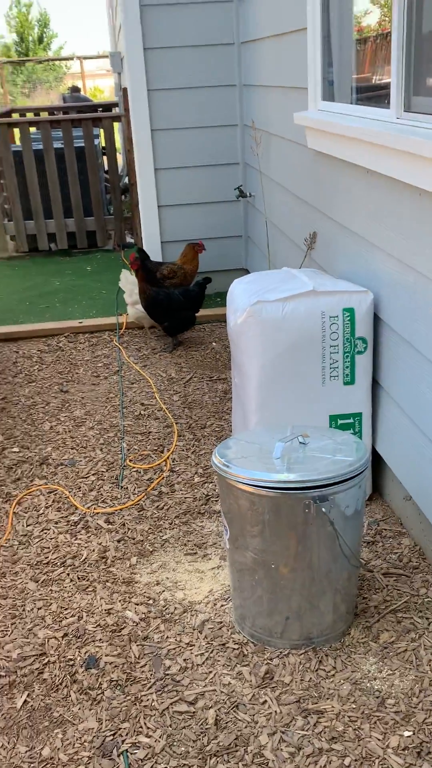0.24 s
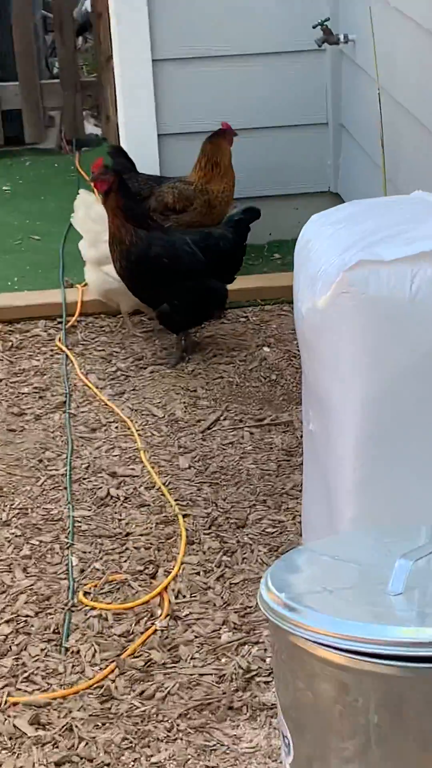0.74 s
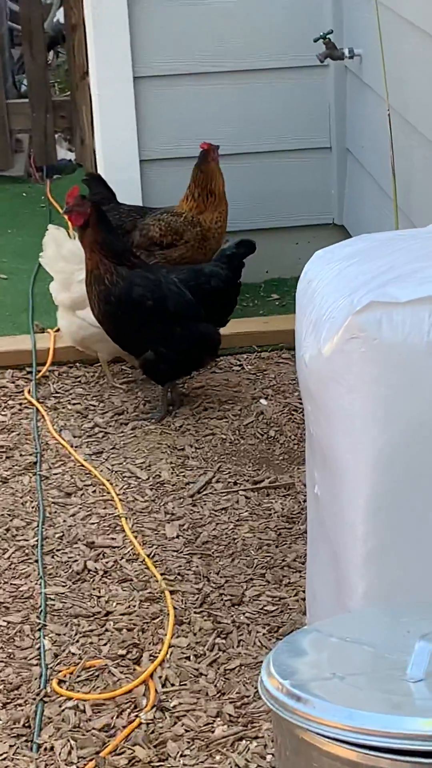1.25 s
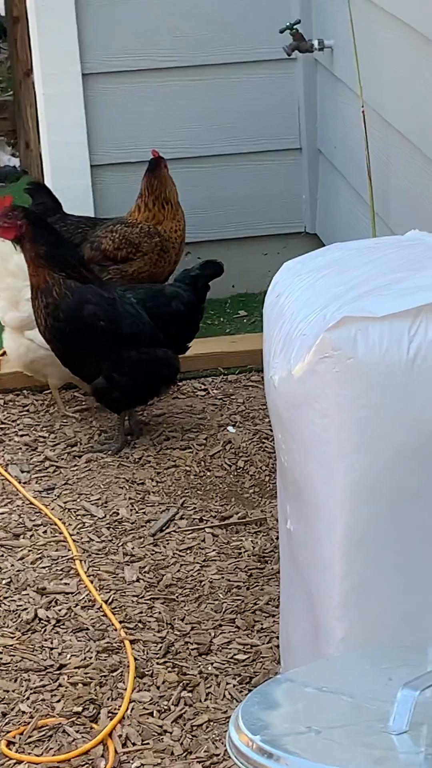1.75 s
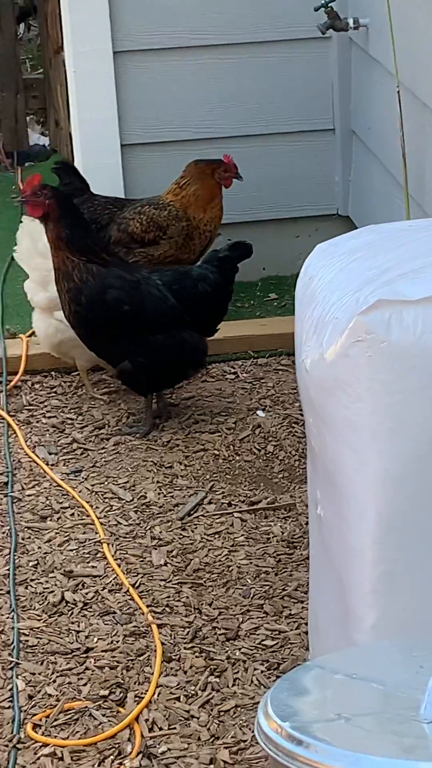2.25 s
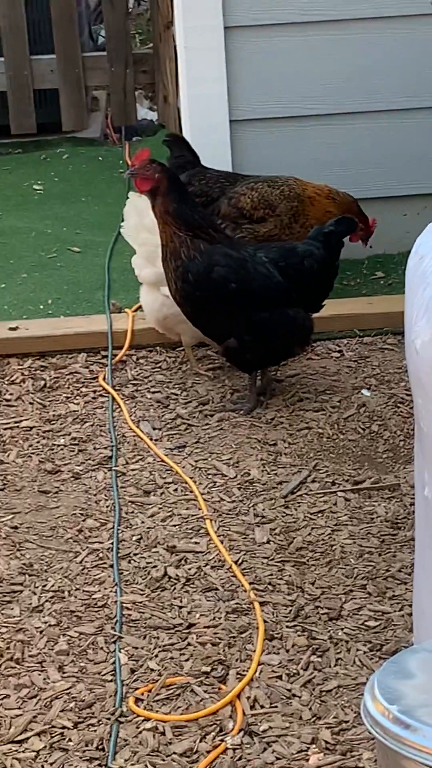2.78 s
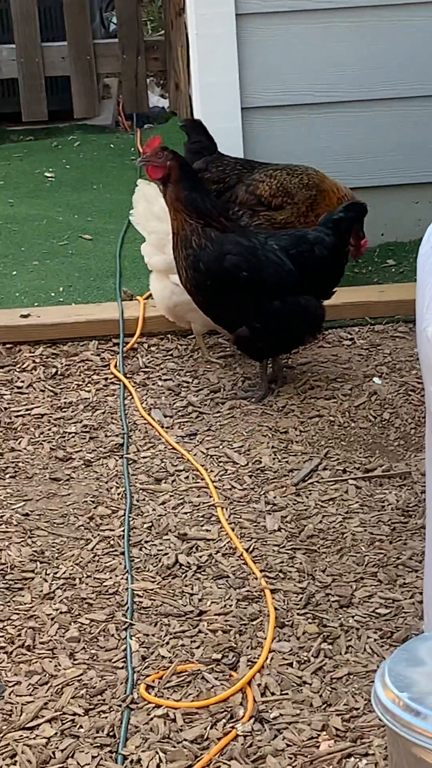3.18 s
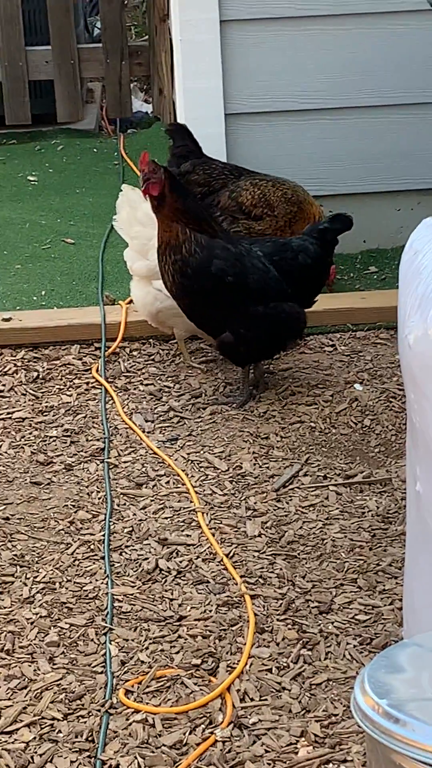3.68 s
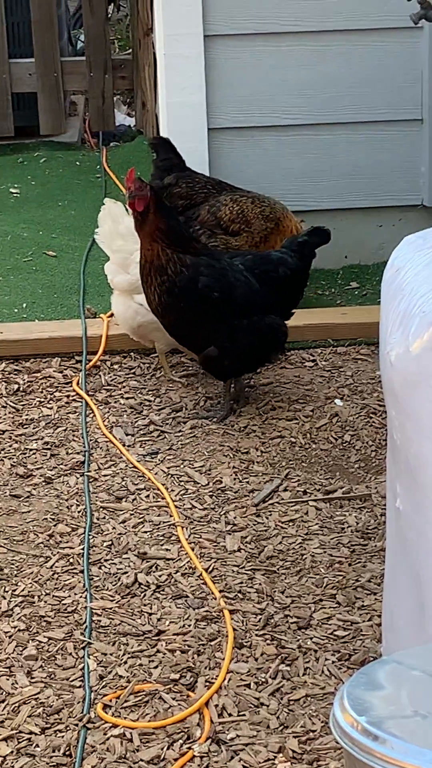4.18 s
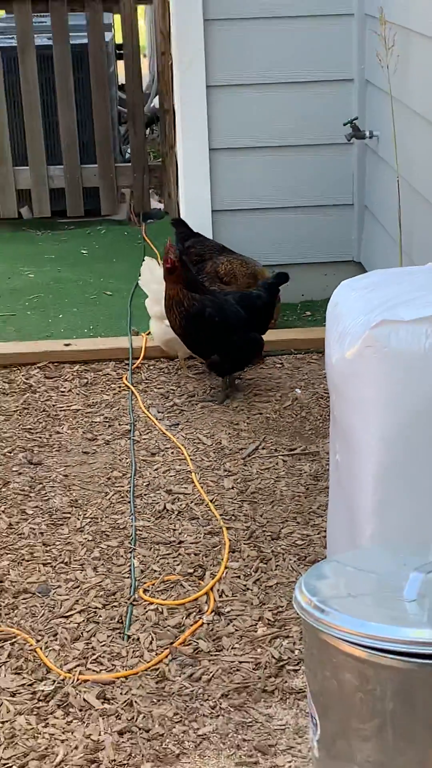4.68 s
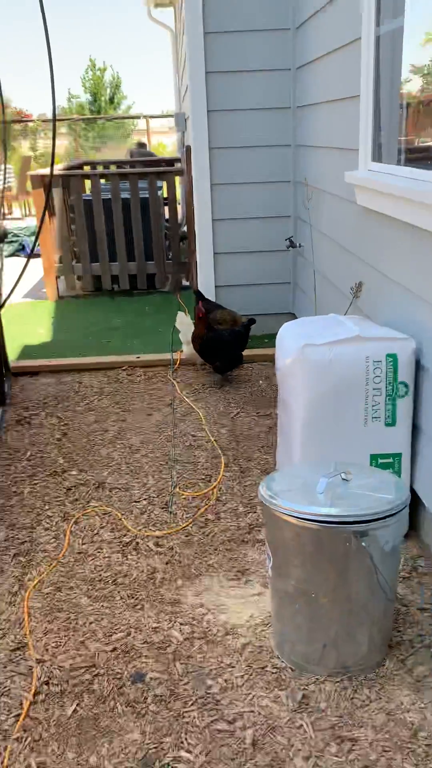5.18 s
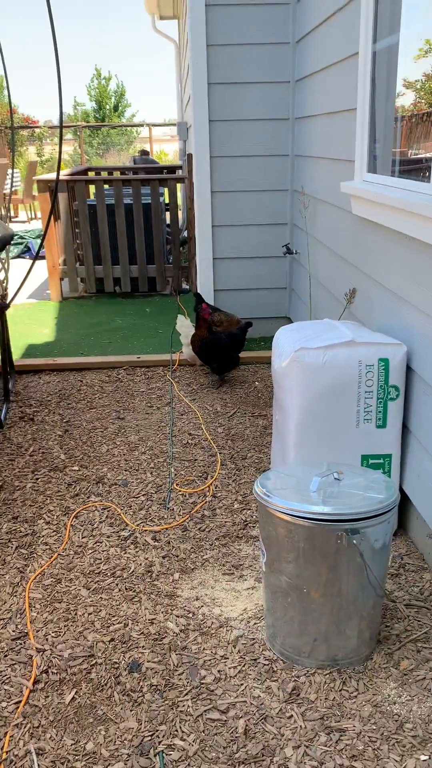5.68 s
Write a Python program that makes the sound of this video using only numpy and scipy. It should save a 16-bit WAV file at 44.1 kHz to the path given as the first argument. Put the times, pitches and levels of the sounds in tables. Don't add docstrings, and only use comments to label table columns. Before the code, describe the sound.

A hen gives low, throaty clucks in a walled yard and twice breaks into a sharp rising squawk, with a late wind thump.

```python
import sys
import numpy as np
from scipy import signal
from scipy.fft import rfft, irfft, next_fast_len
from scipy.io import wavfile
from scipy.ndimage import uniform_filter1d, map_coordinates

SR = 44100
rng = np.random.default_rng(int(sys.argv[2]) if len(sys.argv) > 2 else 0)


def decibels_to_gain(level_db):
    exponent = np.asarray(level_db, float) / 20
    return 10 ** exponent


def generate_wav(sig):
    pcm = np.round(np.clip(np.atleast_2d(sig).T, -1, 1) * 32767).astype(np.int16)
    wavfile.write(sys.argv[1], SR, pcm)


N = 261513

# start in seconds, length in seconds, level in dB, held pitch in Hz,
# head turned to the phone from 0 to 1.
CLUCKS = [(-.035, 0.073, -38.5, 300, 0.6), (0.281, 0.059, -32.5, 257.4, 0.4),
          (1.266, 0.07, -28, 270.4, 0.53), (2.102, 0.068, -27, 295.5, 0.2),
          (2.397, 0.065, -31.5, 256.3, 0.2), (3.235, 0.068, -29.5, 268.5, 0.39),
          (4.645, 0.058, -27, 262.3, .55), (4.945, 0.055, -31.5, 264.8, 0.9), (5.243, .066, -32, 262, 0.87),
          (5.527, .068, -32.5, 241.6, 0.87), (5.827, 0.074, -31.5, 262.7, 0.91)]
# share of its length from 0 to 1, level in dB.
CLUCK_SHAPE = [(0, -6), (.25, -2.5), (.72, -0.5), (.86, -4), (1, -12)]
# time in seconds, pitch in Hz, level in dB,
# beak resonance in dB.
SQUAWKS = [
    [(1.635, 442, -24, -13), (1.68, 450, -19.5, -11.5), (1.737, 458.7, -21.5, -12),
     (1.762, 465.7, -14, -33), (1.802, 480, -18, -36.5), (1.822, 501.6, -14, -24.5),
     (1.838, 540.7, -12, -24), (1.863, 521, -14.5, -21.5), (1.893, 442.3, -30, -18)],
    [(3.637, 431.3, -24.5, -14), (3.657, 446.9, -19.5, -22.5), (3.725, 450, -20, -7),
     (3.76, 464, -14, -20.5), (3.802, 483.4, -21.5, -18.5), (3.822, 496.5, -14.5, -27),
     (3.838, 540.4, -10, -15.5), (3.862, 516, -16.5, -22.5), (3.897, 448, -27.5, -14.5)],
]
# time from the opening
# in seconds, pitch in Hz, level against the open squawk in dB.
SQUAWK_START = [(-.121, 212, -16.5), (-.107, 230.3, -8.5), (-.052, 345, -6), (-.03, 349.8, -7)]
# second resonance in dB, third in Hz, third in dB, treble in dB.
SQUAWK_START_VOICE = (-23.5, 2848, -20, -40.5)
# time from the opening in seconds, roughness, strong-weak alternation
HOARSENESS = [(-.12, .25, .2, 0), (-.075, .4, .2, 0), (-.025, .7, .5, .1), (0, .12, 0, 1),
              (.025, .03, 0, 1), (.19, .04, 0, 1), (.21, .22, .03, 1), (.265, .5, .1, 1)]
# frequency in Hz, left against right in dB.
HEN_SIDE = [(300, .5), (500, 0), (750, -11), (1050, -9), (1500, -3), (2300, -2), (3000, 1), (4000, 0)]
# frequency in Hz, time to fall 60 dB in seconds.
YARD_DECAY = [(250, 0.56), (1000, 0.24), (2100, .26), (3000, 0.25), (3600, 0.23), (10000, 0.075)]
# delay in seconds, level in dB.
WALL_ECHOES = [(.006, -22.5), (0.013, -13), (.019, -15.5), (.031, -15.5)]
# time in seconds, level in dB.
AIR_UNIT_LEVEL = [(0, -58.5), (.43, -52), (.6, -56.5), (1.1, -52.5), (1.45, -52), (1.75, -53), (2.1, -58),
                  (2.5, -57), (3.0, -53), (3.6, -61.5), (4.3, -57), (5.0, -52.5), (5.93, -55)]
# frequency in Hz, density in dB per Hz.
AIR_UNIT_COLOUR = [(12, -53.5), (20, -29.5), (49, -4.5), (70, 1.5), (130, -16), (146, -29.5), (200, -30),
                   (260, -42.5), (440, -120)]
# time in seconds, level in dB.
TOWN_LEVEL = [(0, -71), (.45, -64), (1.0, -71), (1.35, -68.5), (1.95, -70), (2.4, -70.5), (3.0, -71),
              (4.2, -72.5), (4.6, -69.5), (4.9, -63), (5.3, -67), (5.93, -67)]
# frequency in Hz, density in dB per Hz.
TOWN_COLOUR = [(100, -41.5), (160, 9), (300, 4.5), (700, -6), (1300, -7.5), (2200, -25), (4000, -39),
               (8000, -59)]
# frequency in Hz, density in dB per Hz.
HISS_COLOUR = [(1500, -31.5), (3000, 2), (7000, -1.5), (11000, -2), (14000, -3.5), (15700, -14)]
# frequency in Hz, likeness from 0 to 1.
LIKENESS = [(100, 0.99), (200, 0.92), (350, 0.79), (700, .3), (2500, 0.1), (4500, 0.99), (16000, 1)]
# peak time in seconds, peak level in dB, rise in dB per second,
# fall in dB per second.
GUST = [(4.7, -34.5, 291, 70), (4.964, -47, 250, 64), (5.25, -50, 245, 304)]
# peak time in seconds, peak level in dB, rise in dB per second,
# fall in dB per second.
GUST_WASH = [(4.69, -50, 300, 50), (4.86, -50, 90, 48)]
# frequency in Hz, density in dB per Hz.
GUST_COLOUR = [(50, -45), (100, 5.5), (200, 0), (350, -3.5), (600, -20), (1500, -57.5)]
# frequency in Hz, density in dB per Hz.
GUST_WASH_COLOUR = [(200, -18), (400, 1.5), (900, 2), (1500, -1), (3000, -9.5), (4200, -22), (5000, -44),
                    (12000, -46)]
# peak time in seconds, peak level in dB, rise in dB per second,
# fall in dB per second.
RUSTLES = [
    [(0, -58.5, 900, 900), (.056, -56.5, 443, 347), (.244, -63, 65, 150), (.412, -66.5, 40, 2600)],
    [(.746, -76, 900, 320)],
    [(5.422, -64, 870, 95)],
]
# frequency in Hz, density in dB per Hz.
RUSTLE_COLOURS = [
    [(1500, -5.5), (3500, -1), (6500, -3.5), (11000, -15.5), (16000, -25)],
    [(1500, -39), (3500, 2), (6500, 3), (11000, -7), (16000, -21)],
    [(3000, -26), (6000, -4.5), (10500, -3.5), (14000, 5.5), (16000, -9.5)],
]
# peak time in seconds, peak level in dB, rise in dB per second, fall in dB per second.
CREAKS = [(.472, -70.5, 90, 100), (.592, -69.5, 800, 460), (2.69, -83, 300, 30)]
# frequency in Hz, density in dB per Hz.
CREAK_COLOUR = [(1400, -34), (1900, -3.5), (2250, 1.5), (2600, -30)]
# time in seconds, peak in dB, ring in Hz, time to fall 60 dB in seconds.
TICKS = [(0.127, -58, 8100, .002), (.144, -52, 8100, 0.0019), (0.407, -40, 909, 0.0051),
         (0.407, -58, 5000, 0.0024), (.595, -44.5, 1090, 0.0042), (.963, -44.5, 10400, 0.0016),
         (.993, -60, 8700, .01), (2.03, -48.5, 11260, 0.0014), (3.082, -60, 3040, 0.0067),
         (3.116, -44.5, 812, 0.022), (3.118, -52, 4940, 0.014), (4.636, -61.5, 11100, .002),
         (5.46, -64, 2500, 0.0036), (5.482, -66.5, 2480, 0.004)]
# time in seconds, peak in dB, ring in Hz, time to fall 60 dB in seconds.
KNOCK = (.897, -33, 75, .2)
# frequency in Hz, lead in radians.
LEFT_LEAD = [(0, 0), (1300, .1), (2700, 1.3), (4800, 3.14), (15300, 18.85), (17400, 22)]


def unit(x):
    return x / np.sqrt(np.mean(x ** 2) + 1e-20)


def along(points, hz):
    f, value = np.transpose(points)
    return np.interp(np.log(hz + 1), np.log(f + 1), value)


def curves(rows, s):
    at, *columns = np.transpose(rows)
    return [np.interp(s, at, column) for column in columns]


def wobble(rate, size=N):
    knots = rng.standard_normal(int(size * rate / SR) + 4)
    return map_coordinates(knots, [np.arange(size) * rate / SR])


def filtered(x, response):
    m = next_fast_len(x.shape[-1] + 8192)
    spectrum = rfft(x, m) * response(np.fft.rfftfreq(m, 1 / SR))
    return irfft(spectrum, m)[..., :x.shape[-1]]


def add(out, start, x):
    first = round(start * SR)
    part = out[..., max(first, 0):first + len(x)]
    part += x[max(-first, 0):][:part.shape[-1]]


def swells(rows):
    s = np.arange(N) / SR
    levels = [db - np.maximum(rise * (peak - s), fall * (s - peak)) for peak, db, rise, fall in rows]
    return decibels_to_gain(np.max(levels, axis=0))


def rush(colour, patchy_db):
    z = signal.stft(rng.standard_normal((2, N)), nperseg=512)[2]
    patches = uniform_filter1d(rng.standard_normal(z.shape[1:]), size=6, axis=0)
    patches = unit(uniform_filter1d(patches, size=10, axis=1))
    pair = signal.istft(z * decibels_to_gain(patchy_db * patches), nperseg=512)[1][:, :N]

    def mid_and_side(hz):
        turn = np.arccos(np.clip(along(LIKENESS, hz), -1, 1)) / 2
        return decibels_to_gain(along(colour, hz)) * [np.cos(turn), np.sin(turn)]

    mid, side = filtered(pair, mid_and_side)
    return unit(np.array([mid + side, mid - side]))


def closed(second_db, third_hz, third_db, treble_db):
    return [(270, 200, -14), (870, 230, -1), (1100, 260, 0), (1950, 450, second_db),
            (third_hz, 450, third_db), (3820, 330, -24 - (third_hz - 2800) / 80),
            (4600, 500, -36), (5500, 600, treble_db - 3.0), (6900, 500, treble_db),
            (8600, 800, treble_db), (9800, 500, treble_db - 11), (13800, 1800, treble_db - 10.5)]


def wide_open(cheek_db, beak_db):
    return [(450, 54, -19.5), (910, 170, -1.5), (1084, 140, 3.5), (1240, 190, cheek_db),
            (1940, 350, -15.0), (2236, 220, beak_db), (3340, 470, -27.5), (4170, 500, -28.0),
            (6005, 350, -29.5), (7460, 570, -38), (8600, 330, -31.5), (9940, 430, -39.5),
            (11300, 1600, -45.5), (14000, 1500, -54.0)]


def pipe(modes, hz):
    total = 0
    for k, (center, width, db) in enumerate(modes):
        resonance = 1j * hz * width / (center * center - hz * hz + 1j * hz * width)
        total = total + (-1) ** k * decibels_to_gain(db) * resonance ** 2
    return total


def call(pitch, db, hoarse, shut, beak_db):
    sway_db, jitter, shimmer_db, breath = 5.5, .1, 3, 1.2
    edge_s, wake_s = .002, .018
    n = len(pitch)
    on = np.clip(np.minimum(np.arange(n), n - np.arange(n)) / (edge_s * SR), 0, 1)
    rough, alternate, gape = hoarse

    def shake(rate):
        return wobble(rate, size=n)

    def every_sample(g):
        return uniform_filter1d(np.repeat(g, 16, axis=-1), size=16, axis=-1)[..., :n]

    shaken_pitch = pitch * (1 + jitter * rough * (shake(130) + .7 * shake(40)))
    turns = np.cumsum(shaken_pitch + 0.54 * shake(300)) / SR
    k = np.arange(1, 61)[:, None]
    hz = k * pitch[::16]

    moving = pipe(wide_open(-20.5, beak_db[::16]), hz)
    heard = ((1 - gape[::16]) * pipe(shut, hz) + gape[::16] * moving) * (hz > 600)
    size = on * decibels_to_gain(db) / every_sample(np.sqrt(np.sum(np.abs(heard) ** 2, axis=0) / 2))
    size *= (1 + alternate * np.cos(np.pi * turns)) * decibels_to_gain(shimmer_db * rough * shake(110))

    knots = rng.standard_normal((len(k), hz.shape[1] // 150 + 4))
    sway = map_coordinates(knots, np.broadcast_arrays(k - 1, np.arange(hz.shape[1])[None] / 150))
    puffs = rng.standard_normal((2, len(k), hz.shape[1] + 8))
    puffs = 3 * uniform_filter1d(puffs[0] + 1j * puffs[1], size=9, axis=1)[:, 4:-4]
    source = decibels_to_gain((sway_db * sway - 1.0) * (hz > 2500)) * (hz < 15500)
    source = source * (1 + breath * rough[::16] * np.minimum(k / 8, 1.5) * puffs)
    source *= 1 - 0.95 * (hz > 1500) * np.exp(-np.arange(n)[::16] / (wake_s * SR))

    stack = every_sample(source) * np.exp(2j * np.pi * k * turns)
    ring_out = (0, SR // 20)
    pulses = np.pad((1 - gape) * size * stack.real.sum(axis=0), ring_out)
    sung = np.pad(gape * size * np.real(every_sample(moving) * stack).sum(axis=0), ring_out)

    def cavity(f):
        return (1 - 0.76 * np.exp(-((f - 2700) / 230) ** 2)) / (1 + (330 / (f + 1)) ** 6)

    return filtered(pulses, lambda f: pipe(shut, f)) + filtered(sung, cavity)


def cluck(length, db, held_hz, facing):
    first_pitch, rise_s = .8, .016
    rough, alternate = .3, .22
    s = np.arange(round(length * SR)) / SR
    pitch = held_hz * (1 - (1 - first_pitch) * np.exp(-s / rise_s))
    second_db = -25.5 + 0.25 * (held_hz - 260)
    third_hz = 2600 + facing * (3076 - 2600)
    third_db = -31.5 + facing * (-11.5 + 31.5)
    treble_db = -43 + facing * (-41.5 + 43)
    shut = closed(second_db, third_hz, third_db, treble_db)
    hoarse = np.outer([rough, alternate, 0], s ** 0)
    return call(pitch, db + curves(CLUCK_SHAPE, s / length)[0], hoarse, shut, 0 * s)


def squawk(body):
    opening, _, body_db, beak_db = body[0]
    rows = [(opening + s, hz, body_db + db, beak_db) for s, hz, db in SQUAWK_START] + list(body)
    s = np.arange(rows[0][0], rows[-1][0], 1 / SR)
    pitch, db, beak_db = curves(rows, s)
    hoarse = curves(HOARSENESS, s - opening)
    return s[0], call(pitch, db, hoarse, closed(*SQUAWK_START_VOICE), beak_db)


def hen():
    out = np.zeros(N)
    for start, *voice in CLUCKS:
        add(out, start, cluck(*voice))
    for body in SQUAWKS:
        add(out, *squawk(body))
    return out


def yard(x):
    hz, t, z = signal.stft(rng.standard_normal((2, SR // 2)), SR, nperseg=256)
    tail = signal.istft(z * decibels_to_gain(-60 * t / along(YARD_DECAY, hz)[:, None]), SR, nperseg=256)[1]
    tail[1] = 0.37 * tail[0] + .5 * tail[1]
    tail /= np.linalg.norm(tail, axis=1, keepdims=True)
    answer = decibels_to_gain(-12) * np.pad(tail, ((0, 0), (300, 0)))
    answer[:, 0] = 1
    for late, db in WALL_ECHOES:
        answer[:, round(late * SR)] += decibels_to_gain(db)
    return signal.fftconvolve(x[None], answer, axes=1)[:, :N]


def background():
    s = np.arange(N) / SR
    throb_db = curves(AIR_UNIT_LEVEL, s)[0] + 3 + 0.79 * wobble(9) + 1.2 * wobble(2.3)
    throb = decibels_to_gain(throb_db) * rush(AIR_UNIT_COLOUR, patchy_db=2)
    town_db = curves(TOWN_LEVEL, s)[0] + 6.5 + 0.27 * wobble(7.1)
    town = decibels_to_gain(town_db) * rush(TOWN_COLOUR, patchy_db=0.0)
    hiss = decibels_to_gain(-83) * rush(HISS_COLOUR, patchy_db=0.5)
    return throb + town + hiss


def rustles_and_creaks():
    out = np.zeros((2, N))
    for rows, colour in zip(RUSTLES + [CREAKS], RUSTLE_COLOURS + [CREAK_COLOUR]):
        out += swells(rows) * decibels_to_gain(3 + 1.5 * wobble(60)) * rush(colour, patchy_db=2)
    return out


def ticks_and_knock():
    out = np.zeros((2, N))
    t = np.arange(SR // 4) / SR
    for s, db, hz, t60 in TICKS + [KNOCK]:
        add(out, s, decibels_to_gain(db - 60 * t / t60) * np.sin(-2 * np.pi * hz * t))
    return out


def wind_puff():
    low = swells(GUST) * decibels_to_gain(2.8 * wobble(45)) * rush(GUST_COLOUR, patchy_db=2.0)
    bright = swells(GUST_WASH) * decibels_to_gain(0.63 * wobble(36)) * rush(GUST_WASH_COLOUR, patchy_db=3.5)
    return low + bright


def scene():
    def shade(hz):
        return decibels_to_gain(along(HEN_SIDE, hz) * [[1], [0]] + 2.5)

    bird = filtered(yard(hen()), shade)
    return bird + background() + rustles_and_creaks() + ticks_and_knock() + wind_puff()


def band_limit(x):
    return signal.sosfilt(signal.butter(12, 16380, fs=SR, output="sos"), x)


def record(dry):
    f, lead = np.transpose(LEFT_LEAD)

    def widen(hz):
        half_lead = .5 * np.interp(hz, f, lead) * np.array([[1], [-1]])
        return np.exp(1j * half_lead) * (hz < 15750)

    return band_limit(filtered(dry, widen))


dry = scene()
out = record(dry)
generate_wav(out)
```